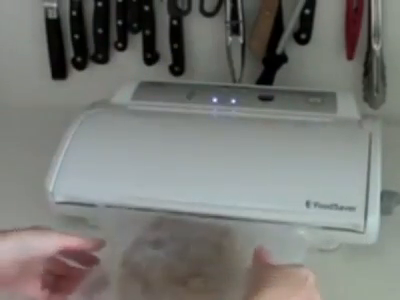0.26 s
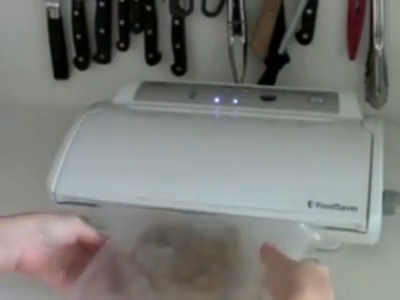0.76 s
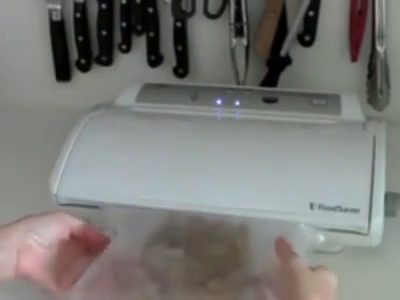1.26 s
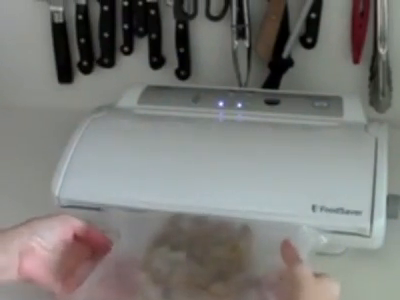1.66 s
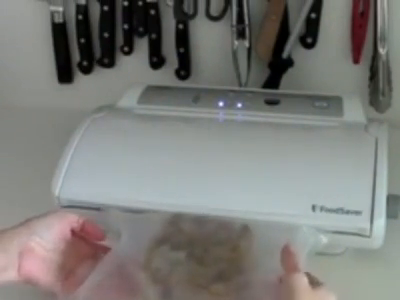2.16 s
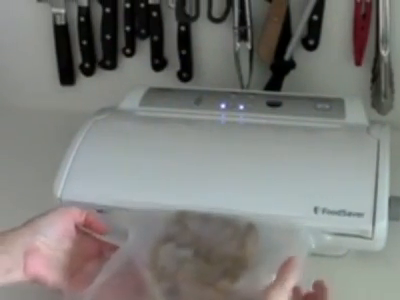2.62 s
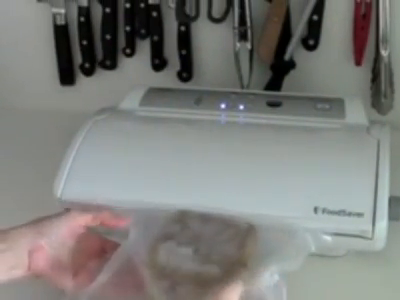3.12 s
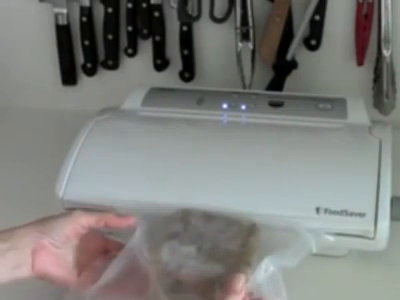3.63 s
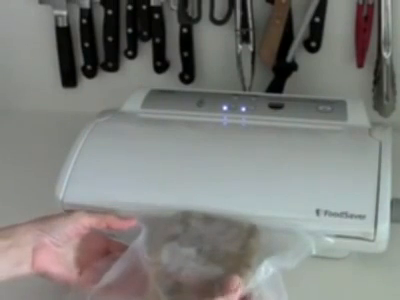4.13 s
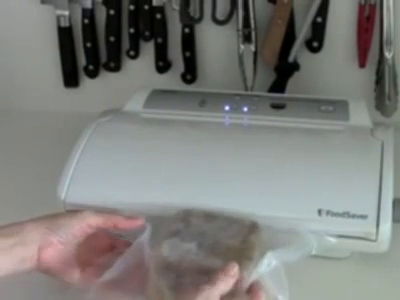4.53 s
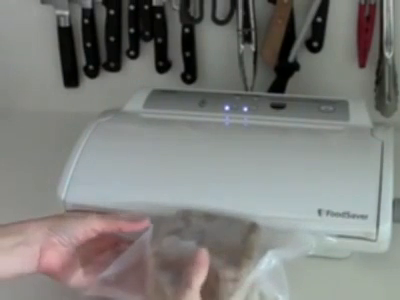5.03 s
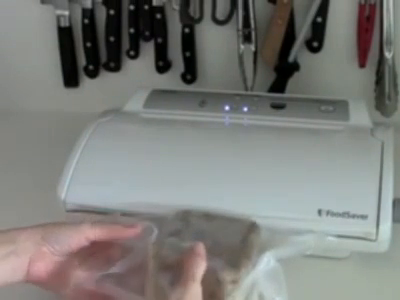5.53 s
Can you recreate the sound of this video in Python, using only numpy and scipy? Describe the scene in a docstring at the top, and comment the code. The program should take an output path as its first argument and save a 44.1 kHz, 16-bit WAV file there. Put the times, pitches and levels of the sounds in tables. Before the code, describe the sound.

Close, rough motor buzz with hissing air and a thin whine, throbbing under load as plastic film snaps and crinkles in a kitchen.

```python
"""On a kitchen counter, close by, a vacuum sealer pulls the air out of a plastic bag.
Its small piston pump makes about 48 strokes a second and slows as the vacuum builds. The reed valves buzz,
throb under load and at times sing: a stack of harmonics of the stroke rate, driven in five parts.
Coloured noise in puffs is the air hissing out, with a short spit on every stroke. The bag crackles in short
noise bursts as it tightens round the food, and the electrics add a thin whine and low hums."""
import sys
import numpy as np
from scipy import signal
from scipy.fft import rfft, irfft, next_fast_len
from scipy.io import wavfile

SR = 44100
rng = np.random.default_rng(int(sys.argv[2]) if len(sys.argv) > 2 else 0)


def store_wav(level_fs):
    """Save 16-bit WAV to argv[1]."""
    pcm = np.round(np.clip(np.atleast_2d(level_fs), -1, 1) * 32767)
    wavfile.write(sys.argv[1], SR, pcm.T.astype(np.int16))


N = 254898

# pump speed, sagging as the vacuum builds: (time [s], speed [strokes per s])
PUMP_SPEED = [(0.0, 49.35), (1.01, 48.903), (1.821, 48.611), (2.28, 48.469), (2.77, 48.569), (3.12, 48.43),
              (4.1, 48.44), (4.27, 48.314), (4.57, 48.314), (5.469, 47.894), (5.78, 47.377)]
# how steadily the pump pulls, which sets the exhaust's spit and the depth of the throb:
# (time [s], share [0-1])
STEADY_PULL = [(.5, 0.2), (1.2, 0.75), (2.3, 0.9), (4.6, 0.88), (5.3, 0.2)]


def buzz(turns, part_db, waver_db, waver_rate, phase_waver, fade_s, ring_lag):
    """Every stroke slaps the valves and shakes the case: a stack of harmonics in five separately driven parts."""
    # balance of the harmonics within each part: (multiple of the stroke rate, level [dB])
    harmonics = [(1, -19.5), (2, -19.5), (3, -11), (4, -15.5), (5, -19), (6, -28.5), (7, -7), (8, -1),
                 (9, -2.5), (10, 0), (11, -12.5), (12, -18), (13, -3.5), (14, -1.5), (15, 4.5), (16, -13),
                 (17, -0.5), (18, -2), (19, -3), (20, -4), (21, -3), (22, -3.5), (23, -1), (24, -3.5),
                 (25, -39), (26, -5.5), (27, -1), (28, -3.5), (29, -3), (30, -11.5), (31, -2), (32, -7.5),
                 (33, -13.5), (34, -3), (35, -13.5), (36, -11), (37, -31), (38, -15.5), (39, -5.5),
                 (40, -11.5), (41, -9), (42, -9), (43, -29), (44, -9.5)]
    # pitches that split the buzz into its five parts: (pitch [Hz])
    part_edges = [20, 300, 560, 790, 1000, 2300]
    # how hard each part is driven, from free flow to the last strain, before surge and trim:
    # (time [s], case [dB], chamber [dB], intake reed [dB], exhaust reed [dB], linkage [dB])
    drive = [(0, -25, -22.5, -29, -33, -24), (.15, -25, -27, -27.5, -26, -19.5),
             (.68, -28, -31, -24, -22.5, -24.5), (1.1, -30.5, -28.3, -20, -22, -22.3),
             (2.2, -35.5, -26, -26, -26.3, -22), (3.3, -34, -24.3, -26.3, -24.5, -21),
             (4.6, -33, -24.5, -26.5, -23, -21.5), (5.05, -33, -25, -24.5, -20, -21),
             (5.28, -32.5, -24.2, -18, -20, -24), (5.66, -33.5, -26.5, -18.7, -24.7, -25),
             (5.78, -27, -31.5, -22.5, -19, -20.5)]
    # how late in the stroke each pitch sounds: (pitch [Hz], delay [share of a stroke])
    stroke_lag = [(50, 0.23), (450, 0.226), (950, 0.2184), (1150, 0.502), (1400, 0.6985), (1750, 0.609),
                  (2200, 0.436)]
    # the valves flutter loosely in free flow and near full vacuum, and slap cleanly between:
    # (time [s], phase spread [rad])
    valve_looseness = [(0, 0.64), (.2, 1.53), (.8, 1.05), (2.2, 0.54), (4.4, 0.53), (5.45, 0.88),
                       (5.78, 1.6)]
    # swing in a surge at full pull: (case [dB], chamber [dB], intake reed [dB], exhaust reed [dB], linkage [dB])
    surge_swing = [-.5, 1, -2.5, 3, .2]
    # an upper note of each reed swings too, the exhaust's first: (pitch [Hz], width [Hz], swing at full pull [dB])
    reed_overtones = [(1350, 44, 2.5), (1650, 25, -4)]

    order, level_db = np.transpose(harmonics)
    hz = order * np.mean(np.array(PUMP_SPEED)[:, 1])
    looseness, = in_time(valve_looseness)
    # adding up the delays from harmonic to harmonic gives each its phase
    lag = 2 * np.pi * np.cumsum(at_hz(stroke_lag, hz))
    scatter = rng.standard_normal(len(hz))
    spells, lifts, rings = singing(hz, fade_s, ring_lag)
    surge = throb()
    overtone_db = sum(swing_db * np.exp(-.5 * ((hz - note) / spread) ** 2)
                      for note, spread, swing_db in reed_overtones)

    out = np.zeros(N)
    parts = zip(part_edges, part_edges[1:], in_time(drive), surge_swing, part_db)
    for low, high, drive_db, surge_db, trim_db in parts:
        part, power = 0, 1e-12
        for k in np.flatnonzero((hz >= low) & (hz < high)):
            steady_db = level_db[k] + lifts[:, k] @ spells
            gain = from_db(steady_db + overtone_db[k] * surge + waver_db * drift(waver_rate))
            phase = looseness * scatter[k] - lag[k] - rings[:, k] @ spells
            phase = phase + phase_waver * drift(waver_rate)
            cycles = order[k] * turns - slipped(order[k])
            part = part + gain * np.cos(2 * np.pi * cycles + phase)
            power = power + gain ** 2 / 2
        # dividing by the summed power: a singing reed draws its energy from the neighbouring harmonics
        out += from_db(drive_db + surge_db * surge + trim_db) * part / np.sqrt(power)
    return out


def singing(hz, fade_s, ring_lag):
    """A singing reed lifts the harmonics near its note and shifts their phase, so that they ring on."""
    # spells in which a reed catches and sings, or (negative lift) a resonance is damped:
    # (start [s], end [s], note [Hz], width [Hz], lift before the part is evened out [dB])
    singing_spells = [(-.1, .15, 540, 35, 18), (-.1, .62, 207, 35, 10.5), (-.1, .62, 370, 56, 10),
                      (-.1, .62, 1159, 17, 11), (.1, 1.62, 800, 32, 6.5), (.62, 1.5, 577, 29, 5.5),
                      (.62, 1.5, 242, 44, 5), (.65, 1.4, 1500, 96, 4.5), (.95, 1.62, 1270, 61, 4),
                      (4.22, 5.2, 1370, 27, 8), (4.72, 5.62, 822, 34, 7), (4.72, 6, 354, 58, 10),
                      (5.18, 5.68, 784, 25, 16), (5.18, 5.65, 547, 65, -15), (5.2, 6, 1590, 18, 15),
                      (5.58, 6, 965, 23, 16), (5.6, 6, 1750, 50, 16)]
    t = np.arange(N) / SR
    start, end, centre, width, lift_db = np.transpose(singing_spells)[:, :, None]
    spells = lift_db * np.clip(np.minimum(t - start, end - t) / fade_s + .5, 0, 1)
    detune = (hz - centre) / width
    lifts = np.exp(-.5 * detune ** 2)
    rings = ring_lag * detune / (1 + detune ** 2)
    return spells, lifts, rings


def throb():
    """The see-saw between the reeds, up to +1 in a surge and -1 between two; it deepens with the pull."""
    # under load, moments when the exhaust reed swells and the intake reed gives way: (time [s])
    surge_times = [.93, 1.14, 1.35, 1.651, 1.85, 2.09, 2.32, 2.51, 2.829, 3.04, 3.2, 3.46, 3.65, 3.86, 4.04,
                   4.31, 4.52, 4.77, 5.07, 5.3]
    fade_s = 0.35  # the throb sets in and dies away over this time
    t = np.arange(N) / SR
    pull, = in_time(STEADY_PULL)
    cycle = np.interp(t, surge_times, np.arange(len(surge_times)))
    fade = np.clip(np.minimum(t - surge_times[0], surge_times[-1] - t) / fade_s, 0, 1)
    return pull * fade * np.cos(2 * np.pi * cycle)


def crank(start_share):
    """Turns of the crank: the running speed added up over time, with a slight tremble."""
    speed, = in_time(PUMP_SPEED)
    return np.cumsum(speed) / SR - start_share + .001 * drift(25)


def slipped(order):
    """Cycles by which one harmonic has moved at the slips; it takes the shortest way to its new place."""
    # the beat slips by about half a stroke as the other valve takes the lead: (time [s], slip [share of a stroke])
    slips = [(1.83, .42), (2.11, .42), (4.42, .53), (5.03, .53)]
    slip_s = .07  # time one slip takes
    t = np.arange(N) / SR
    moves = [(order * share + .5) % 1 - .5 for s, share in slips]
    places = np.cumsum([0] + moves)
    times = [s + side * slip_s for s, share in slips for side in (-.5, .5)]
    return np.interp(t, times, np.repeat(places, 2)[1:-1])


def air(turns, rush_db, spit_db, rasp_db, spit_hz, follow):
    """Air rushes in puffs; the piston rubs alike on every stroke, and the exhaust spits as it opens."""
    # balance of the rush of air and rubbing: (pitch [Hz], relative level per Hz [dB])
    rush_spectrum = [(25, -11), (75, -12), (165, 0), (280, -9), (420, 1), (560, -1.5), (800, 3.5),
                     (1500, 0), (2000, 0), (2250, -10.5), (2750, -9), (3400, -13.5), (5000, -19.5),
                     (11500, -18), (15000, -26)]
    # air flow, of which only the swings about its mean are used: (time [s], level [dB])
    air_flow = [(0.0, -34.5), (1.24, -31.5), (2.37, -36), (2.93, -35), (3.07, -34), (4.75, -33.5),
                (4.92, -32.5), (5.41, -34.5), (5.78, -33)]
    flow_db, = in_time(air_flow)
    flow = from_db(follow * (flow_db - np.mean(flow_db)))

    # one stroke's worth of noise, repeated with the crank
    wall = rng.standard_normal(int(N / turns[-1]))
    rasp = wall[(turns % 1 * len(wall)).astype(int) % len(wall)]
    rough = reflected(rng.standard_normal(N) + from_db(rasp_db) * rasp)
    rush = colour(rough * puff(turns, at=0.39, sharpness=0.14), rush_spectrum)

    # the spit is a short ring on each stroke, clearest while the pump pulls steadily
    opens = np.diff(np.floor(turns - .2), prepend=0) > 0
    clicks = opens * from_db(1.3 * rng.standard_normal(N))
    ring = band(clicks, spit_hz * .93, spit_hz * 1.07)
    spit = rms_one(band(ring, spit_hz * .85, spit_hz * 1.15))
    pull, = in_time(STEADY_PULL)
    return flow * from_db(rush_db) * rush + from_db(spit_db) * pull * spit


def puff(turns, at, sharpness):
    """A smooth swell once in every stroke; rms 1."""
    return rms_one(np.exp(sharpness * np.cos(2 * np.pi * (turns - at))))


def bag(band_db, snap_t60, tail_t60, tail_db, grain_db, rise_s, room_db, room_t60):
    """The film buckles with a sharp snap and a grainy tail of smaller creases, which lingers in the kitchen."""
    # the loudest crackles, before each band's trim:
    # (time [s], low band level [dB], treble relative to it [dB], top tick relative to it [dB])
    loud_crackles = [(0.2523, -8.5, -12.5, -21), (0.3147, -2.5, -19, -23), (0.3179, -7, -13, -17),
                     (0.637, -12, -9.5, -20), (0.6436, -11.5, -14, -20), (0.7941, -11.5, -12, -21),
                     (1.4042, -17, -12, -17), (2.61, -10, -13, -25), (2.6479, -9.5, -11.5, -28),
                     (3.198, -14.5, -12.5, -14), (3.4062, -7.5, -35, -34), (3.5808, -17, -12, -23),
                     (3.8432, -12, -16, -24), (3.926, -8.5, -15, -17), (4.3278, -8, -23, -30),
                     (4.4162, -8.5, -13, -21), (4.8242, -4.5, -14, -17), (5.003, -13, -19, -23),
                     (5.2145, -7, -19, -32), (5.3076, -12, -25, -22), (5.3862, -5.5, -19, -17),
                     (5.4258, -13, -21, -19), (5.5648, -10, -12.5, -26), (5.6052, -13, -7.5, -24),
                     (5.6648, -11, -18, -24), (5.7694, -7.5, -34, -29)]
    # the three bands of a crackle: (lowest pitch [Hz], highest pitch [Hz])
    film_bands = [(2000, 4000), (5100, 9400), (9000, 12500)]
    out, age = np.zeros(N + SR), np.arange(SR // 3) / SR
    for s, low_db, treble_db, tick_db in list(loud_crackles) + faint_crackles(count=9):
        levels_db = low_db, low_db + treble_db, low_db + tick_db
        grain = from_db(grain_db * rng.standard_normal(len(age)))
        creases = rms_one(rng.standard_normal(len(age)) * grain)
        # each part dies away by 60 dB in its t60, in seconds
        snap = rng.standard_normal(len(age)) * from_db(-60 * age / snap_t60)
        tail = creases * from_db(tail_db - 60 * age / tail_t60)
        burst = (snap + tail) * (1 - np.exp(-age / rise_s))
        room = rng.standard_normal(len(age)) * from_db(-60 * age / room_t60)
        at = int(s * SR)
        # the room returns the low part of a snap more than its top
        bands = zip(film_bands, levels_db, band_db, room_db, (1, -1, 1))
        for (low, high), level_db, trim_db, wet_db, sign in bands:
            crackle = rms_one(band(burst + from_db(wet_db) * room, low, high))
            out[at:at + len(age)] += sign * from_db(level_db + trim_db) * crackle
    return out[:N]


def faint_crackles(count):
    """Small creases give way at random, more often as the bag tightens: rows like those of the loud crackles."""
    mean_db, mean_treble_db, spread_db = -19, -14, 1
    crowding = 2.2  # towards the end; 1 = evenly
    when, strength, colouring = rng.random((count, 3)).T
    low_db = mean_db + spread_db * (2 * strength - 1)
    treble_db = mean_treble_db + spread_db * (2 * colouring - 1)
    return list(zip(N / SR * when ** (1 / crowding), low_db, treble_db, treble_db))


def electrics(whine_db, octave_db, waver, flutter_db):
    """A thin whine with its octave, fluttering in level, over low hums: all sine waves."""
    # the whine, loudest while the pump runs free, before trim and flutter: (time [s], level [dB])
    whine_level = [(0, -24.5), (1.2, -25), (1.5, -27), (2.4, -28.5), (5.62, -29.5), (5.72, -25.5)]
    # steady hums: (pitch [Hz], rms level [dB])
    low_hums = [(120, -47), (168, -38.5)]
    whine_hz = 1969.6
    t = np.arange(N) / SR
    level_db, = in_time(whine_level)
    angle = 2 * np.pi * whine_hz * t + waver * drift(5.2)
    level = from_db(level_db + whine_db + flutter_db * drift(3.5))
    octave = from_db(octave_db + 2 * drift(3.2)) * np.sin(2 * angle)
    whine = level * (np.sin(angle) + octave)
    hums = sum(from_db(db) * np.sin(2 * np.pi * hz * t + 0.46 * drift(4.4)) for hz, db in low_hums)
    return np.sqrt(2) * (whine + hums)  # a sine of rms 1 peaks at root 2


def reflected(x):
    """Add one near reflection and one late slap: quieter, delayed copies."""
    # (delay [s], level [dB])
    echoes = [(.0037, -10), (.06, -8)]
    return x + sum(from_db(db) * np.pad(x, (int(delay * SR), 0))[:N] for delay, db in echoes)


def colour(x, spectrum):
    """Give a sound a spectrum and the resonances of the housing; rms 1."""
    # resonances of the housing, a negative lift being a dip: (pitch [Hz], half-width [Hz], lift [dB])
    housing = [(2364, 35, 6), (2570, 49, 8.5), (3020, 36, 2.5), (3717, 48, 9), (4050, 280, 6),
               (5830, 59, 1.5), (7900, 45, 1.5), (8830, 270, 2.5), (9540, 83, 4), (10730, 120, 7),
               (11450, 80, -2.5), (11580, 110, 7.5), (13000, 70, 9.5), (13520, 140, 10)]
    size = next_fast_len(N)
    hz = np.fft.rfftfreq(size, 1 / SR)
    lift = sum(lift_db / (1 + ((hz - centre) / width) ** 2) for centre, width, lift_db in housing)
    level_db = at_hz(spectrum, hz) + lift
    return rms_one(irfft(rfft(x, size) * from_db(level_db), size)[:N])


def band(x, low_hz, high_hz):
    """A gentle band-pass."""
    return signal.sosfilt(signal.butter(2, [low_hz, high_hz], "band", fs=SR, output="sos"), x + 1e-18)


def drift(rate):
    """A slow random wander of rms 1: smoothed noise, drawn every 40 samples; a higher rate [Hz] is quicker."""
    r = np.exp(-80 * np.pi * rate / SR)
    noise = rng.standard_normal(N // 40 + 2002)
    slow = signal.lfilter([1], [1, -2 * r, r * r], noise)[2000:]  # skip the filter's start
    return np.interp(np.arange(N) / 40, np.arange(len(slow)), rms_one(slow))


def in_time(rows):
    """Each column of a time table, at every sample."""
    s, *columns = np.transpose(rows)
    return [np.interp(np.arange(N) / SR, s, c) for c in columns]


def at_hz(points, hz):
    """Read a pitch table on a log-frequency axis."""
    return np.interp(np.log(hz + 1e-9), np.log(np.array(points)[:, 0]), np.array(points)[:, 1])


def from_db(db):
    """Decibels to gain."""
    return 10 ** (np.asarray(db) / 20)


def rms_one(x):
    """Scale to an rms (average strength) of 1."""
    return x / np.sqrt(np.mean(x ** 2) + 1e-20)


def scene():
    """The crank angle times the buzz and the puffs of air; the bag and the electrics are added."""
    turns = crank(start_share=.17)
    pump = buzz(turns, part_db=[-2.3, -0.43, -0.56, -0.35, -1.74], waver_db=1.5, waver_rate=6.4,
                phase_waver=0.14, fade_s=.05, ring_lag=0.085)
    hiss = air(turns - slipped(order=1), rush_db=-24.5, spit_db=-36.5, rasp_db=-5.0, spit_hz=2533, follow=0.6)
    crackle = bag(band_db=[-29.0, -22.5, -25.0], snap_t60=0.009, tail_t60=0.13, tail_db=-21.5, grain_db=6.5,
                  rise_s=0.00085, room_db=[-23.0, -29.0, -35.0], room_t60=0.42)
    whine = electrics(whine_db=-0.5, octave_db=-17.5, waver=0.15, flutter_db=1.65)
    return (pump + hiss + whine + reflected(crackle))[None]


def record(dry):
    """The highest peaks are rounded and the top is cut steeply."""
    cutoff_hz = 15100
    rounded = dry / (1 + (dry / .8) ** 8) ** (1 / 8)
    return signal.sosfilt(signal.ellip(12, .1, 90, cutoff_hz, fs=SR, output="sos"), rounded)


dry = scene()
out = record(dry)
store_wav(out)
```